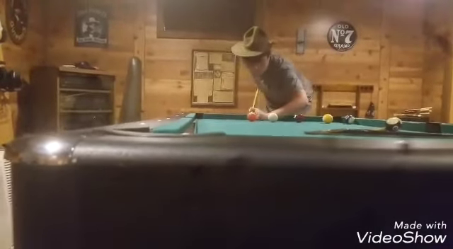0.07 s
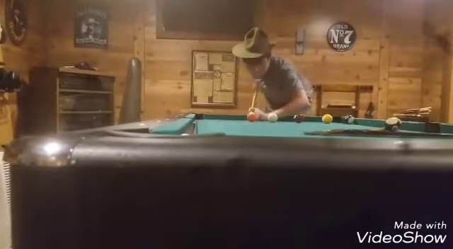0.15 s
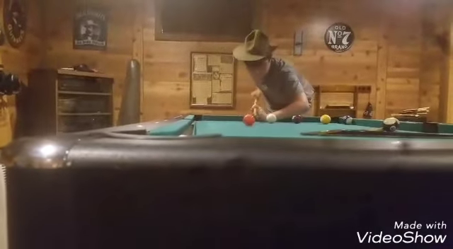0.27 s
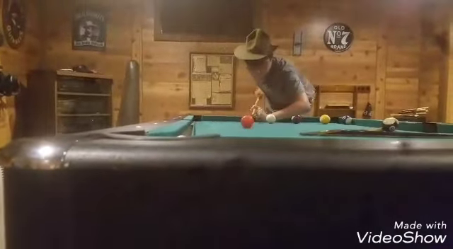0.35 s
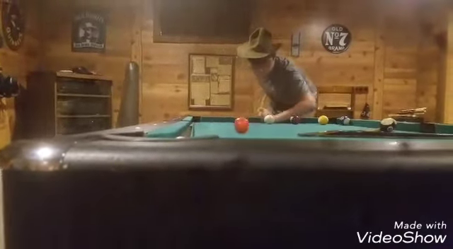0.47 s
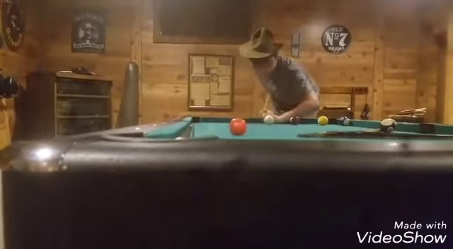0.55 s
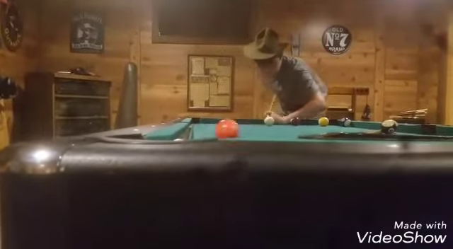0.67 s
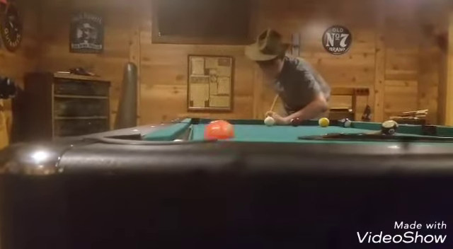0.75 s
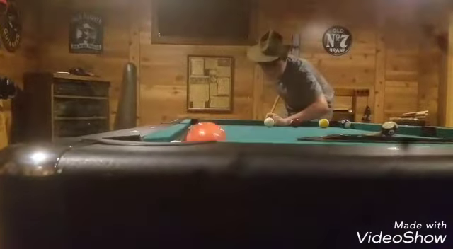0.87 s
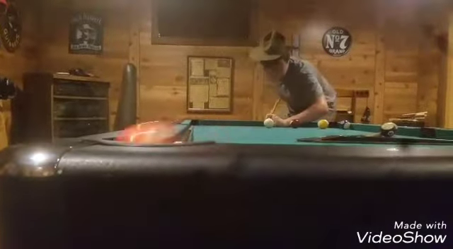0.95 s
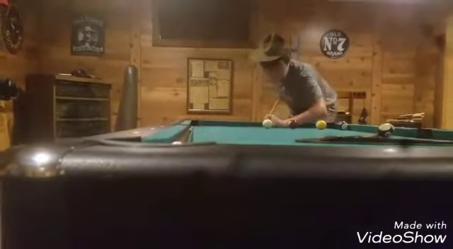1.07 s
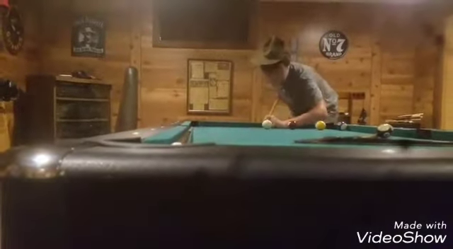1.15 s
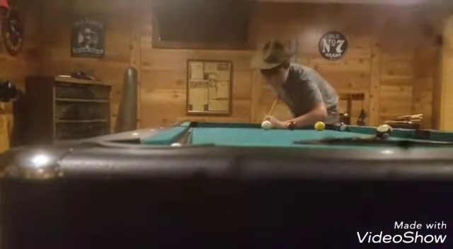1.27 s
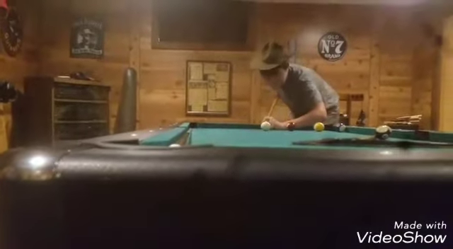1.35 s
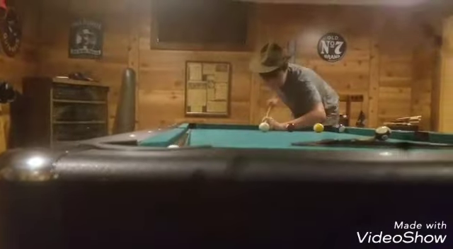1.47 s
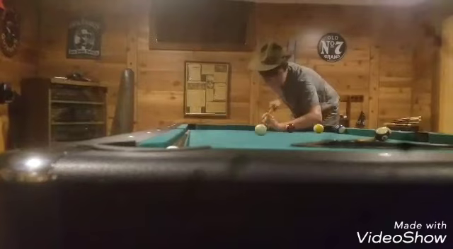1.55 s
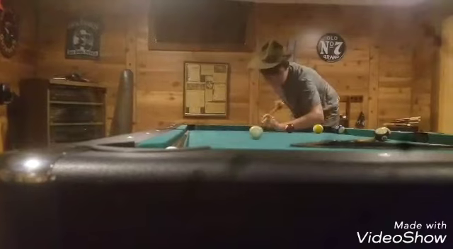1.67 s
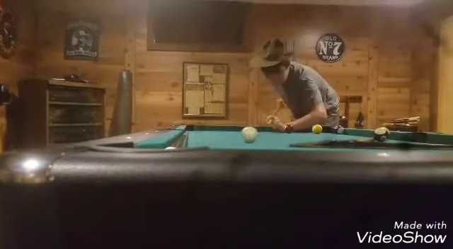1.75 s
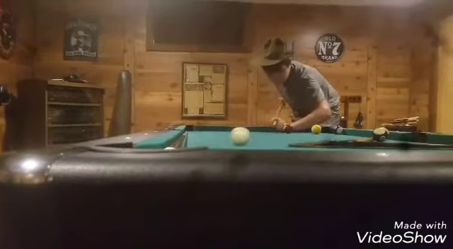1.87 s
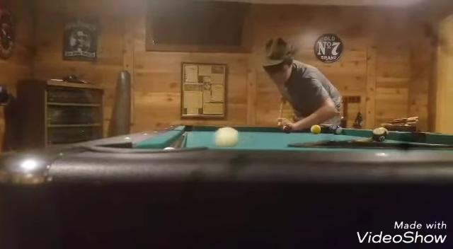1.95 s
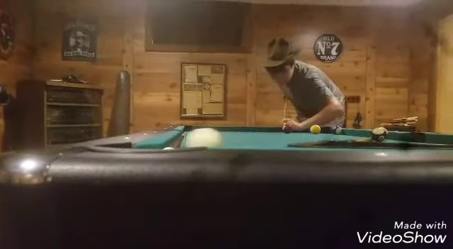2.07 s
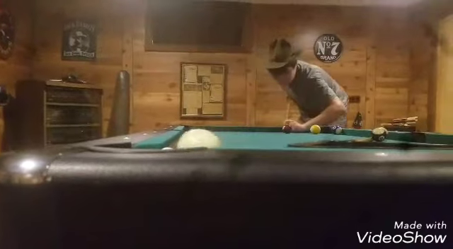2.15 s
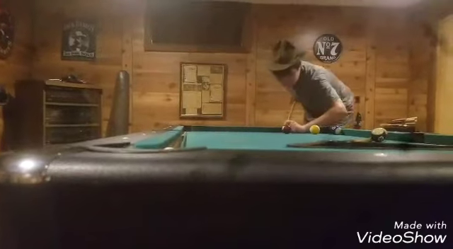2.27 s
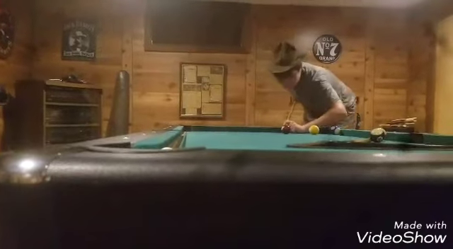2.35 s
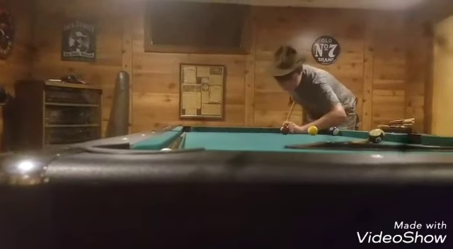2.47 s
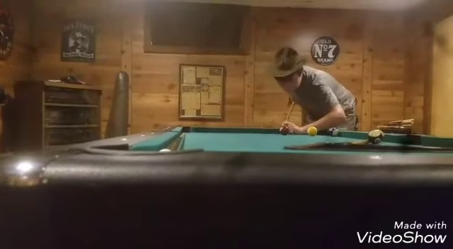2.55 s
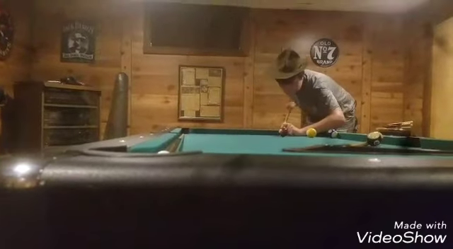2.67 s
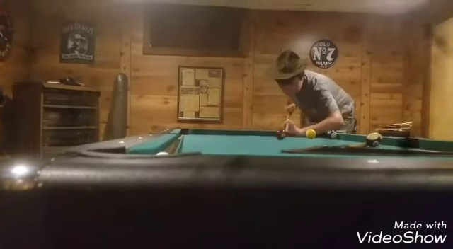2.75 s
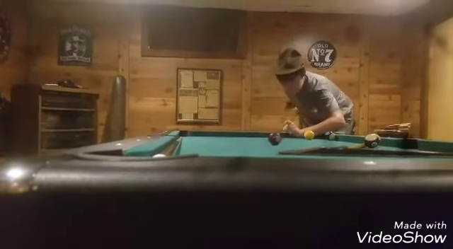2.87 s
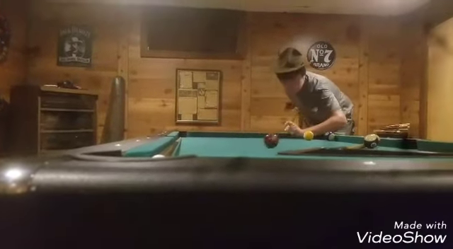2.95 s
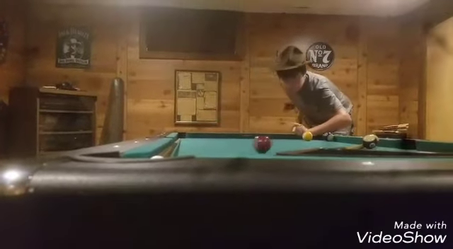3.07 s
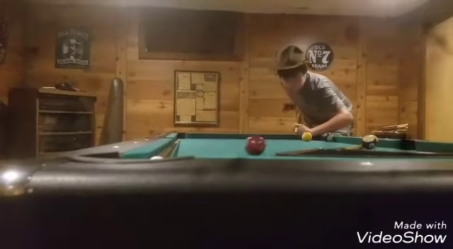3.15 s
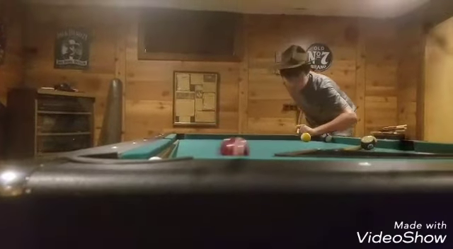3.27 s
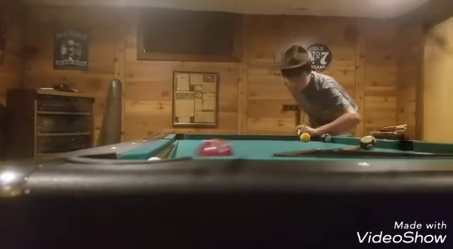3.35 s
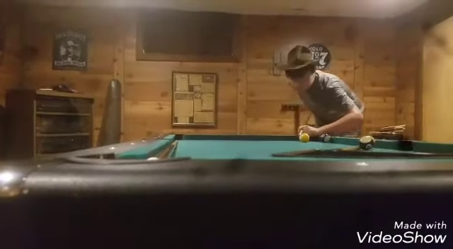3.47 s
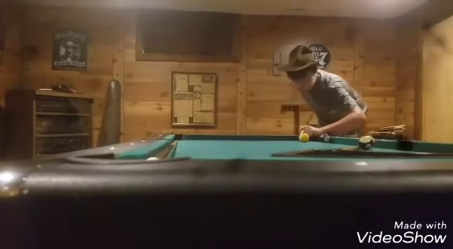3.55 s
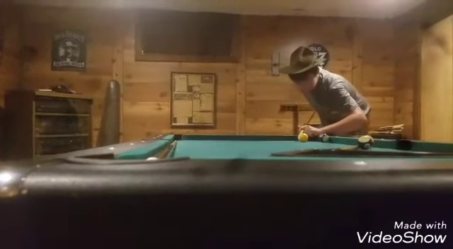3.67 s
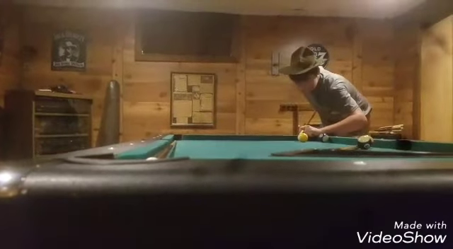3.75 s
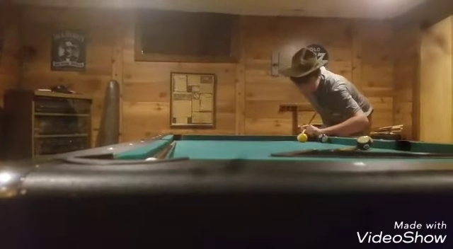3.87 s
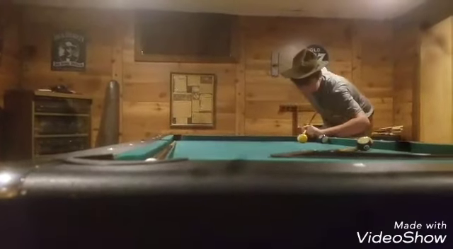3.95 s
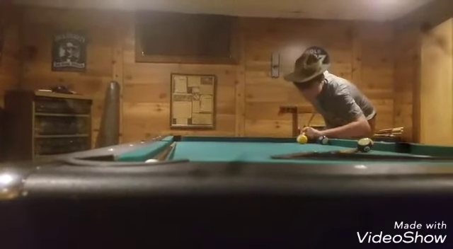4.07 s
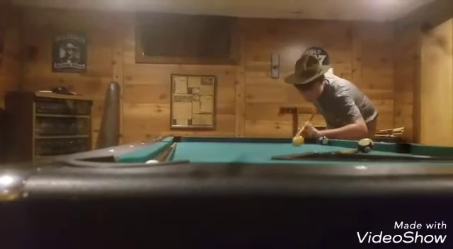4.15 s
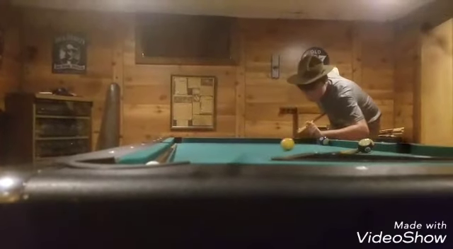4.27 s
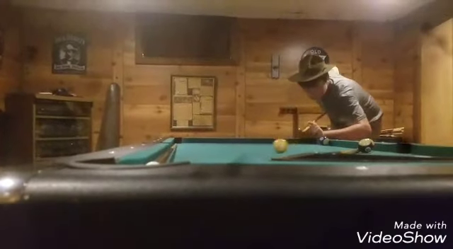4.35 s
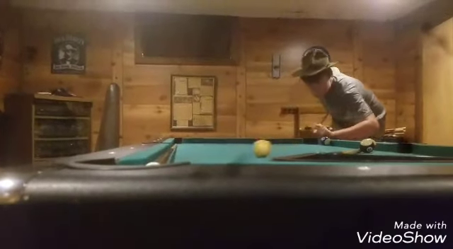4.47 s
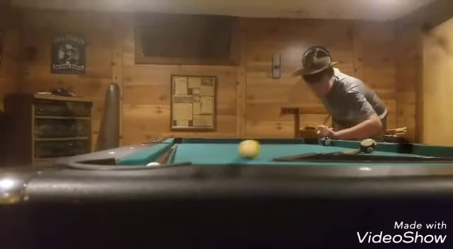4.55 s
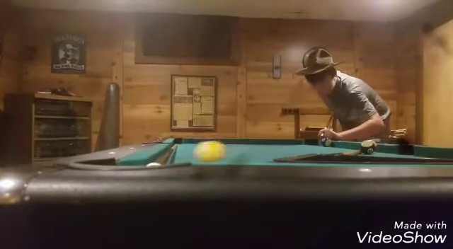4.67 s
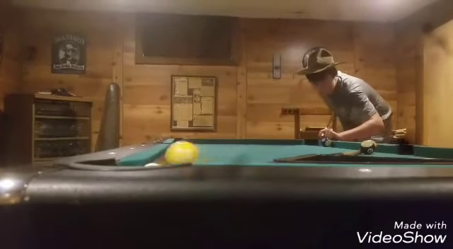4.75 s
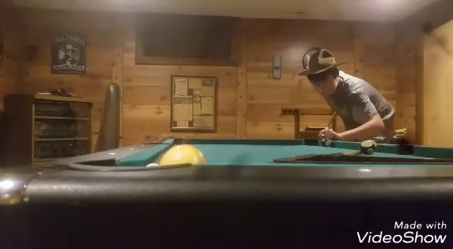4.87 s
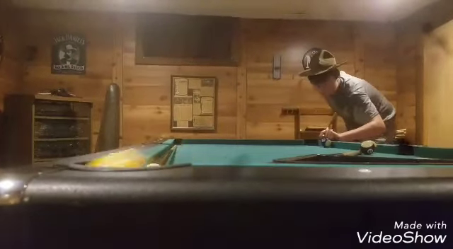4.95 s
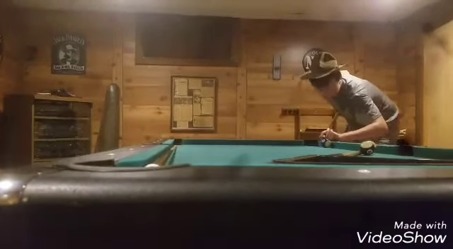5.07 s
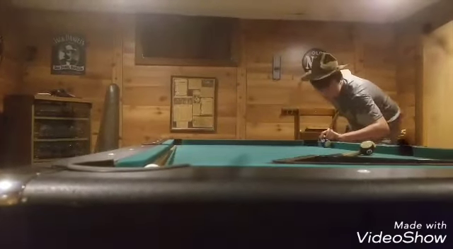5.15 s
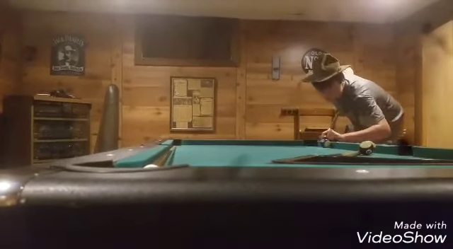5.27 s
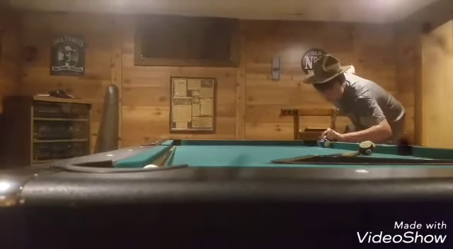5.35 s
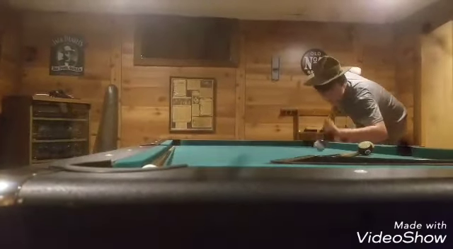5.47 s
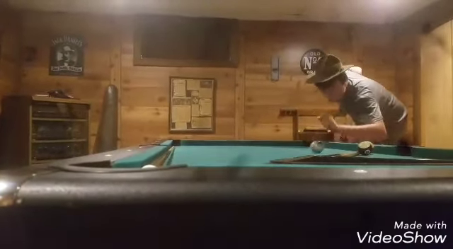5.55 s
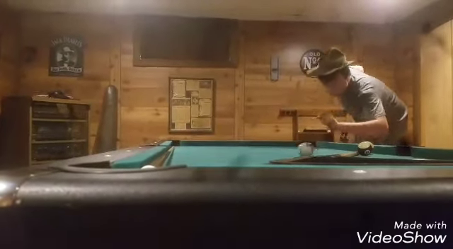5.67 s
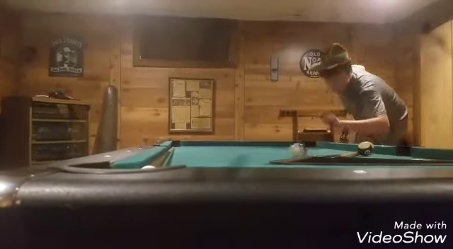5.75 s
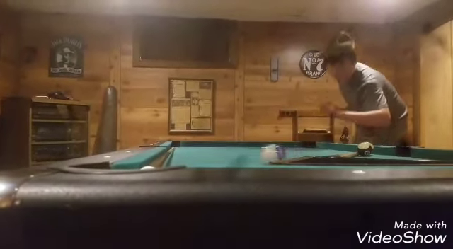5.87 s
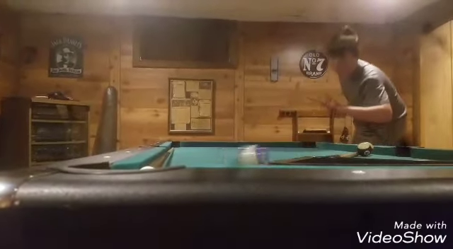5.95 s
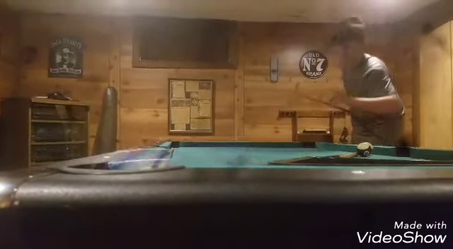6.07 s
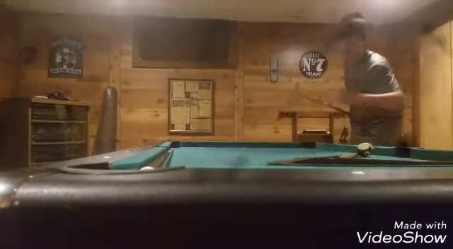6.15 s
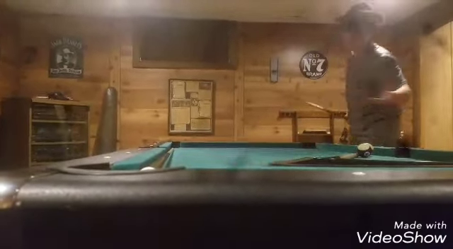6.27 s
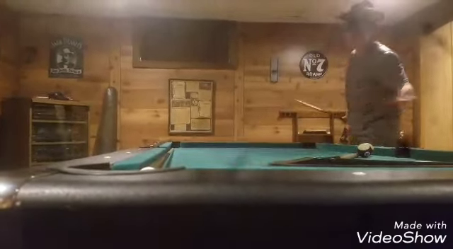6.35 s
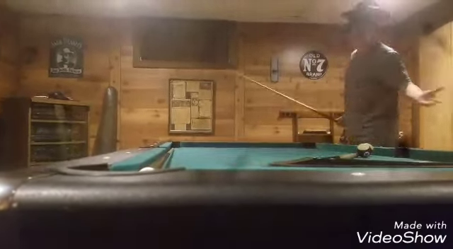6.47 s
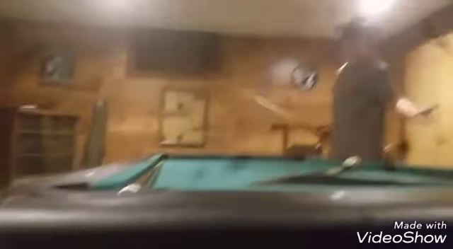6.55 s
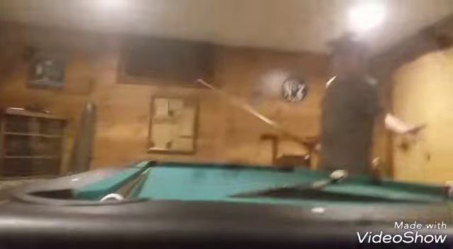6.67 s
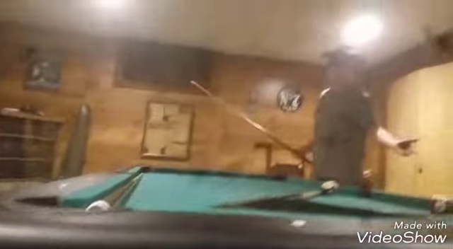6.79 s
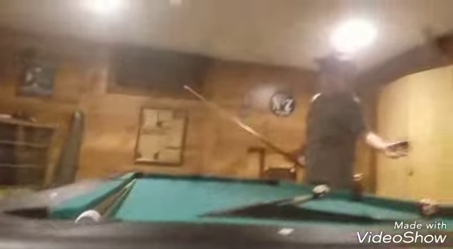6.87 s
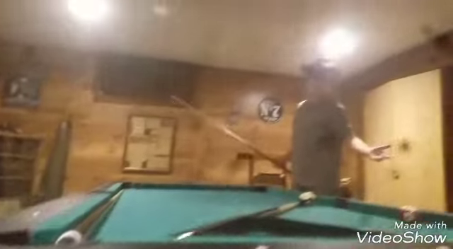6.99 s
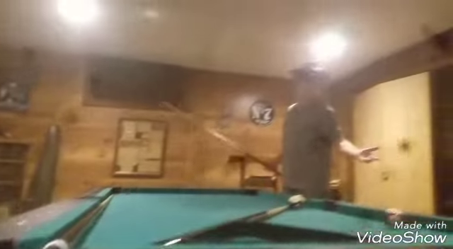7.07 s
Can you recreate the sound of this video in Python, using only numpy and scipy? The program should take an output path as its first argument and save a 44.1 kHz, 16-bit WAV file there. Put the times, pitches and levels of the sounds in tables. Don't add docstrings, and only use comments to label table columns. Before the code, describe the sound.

A phone resting on the table rail hears a player pocket five balls in a row. Dull cue knocks across the table alternate with louder, closer pocket impacts: thud, liner tick, then hard ball-on-ball clacks dying into a quick rattle. The fourth and fifth strokes are snappier, and the last ball rattles longest. Quiet room drone, fridge hum and very faint cricket chirps underneath.

```python
import sys
import numpy as np
from scipy import signal
from scipy.fft import rfft, irfft, next_fast_len
from scipy.io import wavfile
from scipy.ndimage import uniform_filter1d

SR = 44100
rng = np.random.default_rng(int(sys.argv[2]) if len(sys.argv) > 2 else 0)


def transcribe(u):
    v = np.clip(np.atleast_2d(u).T, -1, 1)
    q = np.round(v * 32767).astype(np.int16)
    wavfile.write(sys.argv[1], SR, q)


def level_to_linear(level):
    exponent = np.asarray(level, float) / 20
    return 10 ** exponent


N = 313985
TAIL = 2 ** 14
TIME = np.arange(TAIL) / SR
IMPULSE = (TIME == 0).astype(float)

# pitch in Hz, level in dB, t60 in seconds.
TABLE_MODES = [(95.4, -10, 0.26), (183.8, -3, 0.29), (228, 0, 0.052), (290.4, -6.5, 0.15),
               (425, -11.5, 0.11), (496, -7.5, 0.13), (657, 3, 0.014), (753, -9.5, 0.17), (995, -10, 0.11),
               (1139, -3, 0.12), (2110, -7, 0.06)]
# pitch in Hz, level in dB, t60 in seconds.
TRAY_MODES = [(1010, -77, 0.083), (1284, 5.5, 0.0063), (1670, -10, 0.035), (1882, -1.5, 0.059),
              (2090, 6.5, 0.024), (2502, 7, 0.0047), (2900, 4, 0.015), (3150, -17, 0.0055),
              (3750, -43, 0.0096), (4220, 16.5, 0.0096)]
# frequency in Hz, level in dB per Hz.
BALL_TONE = [(290, -11.5), (500, -1), (800, 1), (1300, 3), (1600, 4.5), (2100, 2.5), (2600, 7), (3100, 2),
             (3800, -6), (4600, -17.5), (5300, -25), (7000, -37.5), (12000, -42.5), (16000, -89)]


def unit(x):
    return x / np.sqrt(np.mean(x ** 2))


def fade(t60_s):
    return np.exp(-np.log(1000) * TIME / max(t60_s, 0.01))


def colour(x, points, causal=False):
    hz, db = np.transpose(points)
    size = next_fast_len(x.shape[-1])
    bin_hz = np.arange(size // 2 + 1) * SR / size
    log_gain = np.interp(np.log(bin_hz + 1), np.log(hz), db) * np.log(10) / 20
    if causal:
        cepstrum = irfft(log_gain, size)
        cepstrum[1:size // 2] *= 2
        log_gain = rfft(cepstrum[:size // 2], size)
    return irfft(rfft(x, size) * np.exp(log_gain), size)[..., :x.shape[-1]]


def port_colour(pair, difference, causal=False):
    left = colour(pair[0], [(hz, db / 2) for hz, db in difference], causal)
    right = colour(pair[1], [(hz, -db / 2) for hz, db in difference], causal)
    return np.array([left, right])


def spread(length):
    size = next_fast_len(length)
    mid, side = rfft(rng.standard_normal((2, size)))
    bin_hz = np.arange(len(mid)) * SR / size
    share = 1 / np.sqrt(1 + (1000 / (bin_hz + 1)) ** 2)
    return irfft(np.array([mid + share * side, mid - share * side]), size)[:, :length]


def swells(rows):
    t = np.arange(0, N, 64) / SR
    bells = sum(level_to_linear(db) * np.exp(-0.5 * ((t - s) / width_s) ** 2) for s, db, width_s in rows)
    return np.interp(np.arange(N) / SR, t, bells)


def echoes(wet_db, t60_s, build_s, sparse, flutter=0., late_s=0.):
    # delay in seconds, left level in dB, right level in dB.
    pocket_faces = [
        (.0032, -5, -2),
        (.0058, -6, -2),
        (.0096, -7, -6),
    ]
    air = spread(TAIL)
    bass = uniform_filter1d(air, size=60)
    treble = air - uniform_filter1d(air, size=8)
    middle = air - bass - treble
    tail = bass * fade(1.3 * t60_s) + middle * fade(t60_s) + treble * fade(0.92 * t60_s)
    tail *= (1 - np.exp(-TIME / build_s)) * level_to_linear(wet_db - 20.0 + 0.41 * np.minimum(TIME / 0.048, 1))

    chance = rng.random((12, 3))
    delay = (SR * (0.002092 + 0.032 * chance[:, 0] ** 1.2)).astype(int)
    tail[:, delay] += sparse * level_to_linear(wet_db) * (0.087 + 1.65 * chance[:, 1:].T) * fade(0.3 * t60_s)[delay]
    for delay_s, *port_db in pocket_faces:
        jitter = rng.standard_normal(2)
        at = int(delay_s * (1 + 0.01 * jitter[0]) * SR)
        tail[:, at] += flutter * level_to_linear(np.array(port_db) + 0.98 * jitter[1])
    tail[:, 0] = 1
    if late_s:
        dull = signal.lfilter(np.hanning(16) / 12.4, 1, tail)
        tail -= (tail - dull) * np.exp(-TIME / late_s)
    return tail


def add(out, s, db, pan_db, pulse, room, rise_s=1e-6):
    sound = signal.fftconvolve(np.atleast_2d(pulse), room, axes=1)[:, :TAIL]
    sound = sound * (1 - np.exp(-((TIME[:sound.shape[1]] + 1 / SR) / rise_s) ** 2))
    loudest = np.sqrt(uniform_filter1d(np.mean(sound ** 2, axis=0), size=250).max())
    start = int(s * SR)
    sound = sound[:, :N - start] * level_to_linear(db - 10.0) / loudest
    out[:, start:start + sound.shape[1]] += sound * level_to_linear(np.array([[pan_db], [-pan_db]]) / 2)


def ring(modes, pivot_hz):
    body = 0
    for hz, db, t60_s in modes:
        level, detune, side = rng.standard_normal(3)
        sign = -1 if hz > pivot_hz and side < 0 else 1
        swing = np.sin(2 * np.pi * hz * (1 + 0.018 * detune) * TIME)
        body = body + sign * level_to_linear(db + 2 * level) * swing * fade(t60_s)
    return body


def blows(rows, tone, modes, pivot_hz, body_db, build_s, sparse, flutter=0., late_s=0., rise_s=1e-6,
          contact_power=0., lead_s=0.):
    out = np.zeros((2, N))
    for s, db, tilt_db, wet_db, t60_s, pan_db in rows:
        reach = level_to_linear(contact_power * (db + 8))
        tilted = [(hz * reach, level_db + tilt_db * np.clip(np.log2(hz / pivot_hz), -1.5, 1.5))
                  for hz, level_db in tone]
        struck = IMPULSE + level_to_linear(body_db) * ring(modes, pivot_hz)
        pulse = colour(struck, tilted, causal=not lead_s)
        pulse = np.roll(pulse, int(lead_s * SR))[:TAIL * 3 // 4]
        onset = (TIME[:len(pulse)] + 1 / SR) / max(lead_s / 2, 1 / SR)
        pulse = pulse * np.minimum(onset, 1) ** 2
        add(out, s, db, pan_db, pulse, echoes(wet_db, t60_s, build_s, sparse, flutter, late_s), rise_s)
    return out


def cue_strokes():
    # start in seconds, level in dB, tilt in dB per octave, room share in dB,
    # decay in seconds.
    strokes = [
        (0.2863, 0, 3.5, 14, 0.26),
        (1.5539, 0, 2.5, -3, 0.24),
        (2.7841, -0.5, 4.5, -1.5, 0.23),
        (4.198, 0.5, 8, -2, 0.26),
        (5.488, -1.5, 10, 6, 0.28),
    ]
    # frequency in Hz, level in dB per Hz.
    cue_tone = [(35, -79), (60, -12), (113, -10.5), (169, -3.5), (283, 6), (760, -11), (1150, -19),
                (1500, -22.5), (1650, -35.5), (2090, -27.5), (3420, -39), (3840, -35), (12700, -49.5),
                (14700, -55.5), (16500, -91)]
    damped = [(hz, db, min(t60_s, 0.16)) for hz, db, t60_s in TABLE_MODES]
    return blows([(*row, 0) for row in strokes], cue_tone, damped, 280, body_db=-44, build_s=0.00032,
                 sparse=0.57, late_s=0.0068, rise_s=0.00084)


def pocket_thuds():
    # start in seconds, level in dB, tilt in dB per octave,
    # decay in seconds.
    wall_hits = [(1.0232, -2.5, 4, 0.24), (1.094, -8.5, 4.5, 0.18), (1.216, -12, -4.5, 0.12),
                 (2.2828, -2.5, 4, 0.28), (2.354, -14.5, 0, 0.18), (2.48, -7, -3, 0.16),
                 (3.51, -15, -4, 0.21), (3.58, -4, 7.5, 0.33), (4.281, -0.5, -2, 0.23),
                 (4.935, -10.5, 5.5, 0.28), (5.0135, -4, 3.5, 0.22), (5.086, -9.5, 7, 0.28),
                 (5.585, 1, 2.5, 0.25), (5.629, -1.5, -2.5, 0.094), (6.19, -12.5, -5, 0.18),
                 (6.242, -8.5, 5.5, 0.19)]
    # start in seconds, level in dB.
    slate_hops = [
        (0.62, -18.5),
        (1.778, -24.5),
        (1.922, -24),
        (3.149, -17.5),
        (4.462, -25),
        (4.607, -36),
        (5.841, -17),
    ]
    # frequency in Hz, level in dB per Hz.
    thud_tone = [(35, -110), (60, -22), (128, -18.5), (185, -11.5), (241, -1.5), (296, 2), (484, -4.5),
                 (547, -2), (859, -12.5), (1490, -31), (2250, -32), (8000, -58), (10400, -102),
                 (17600, -120)]
    room_db, pan_db = -7, 0.5
    rows = [(s, db, tilt_db, room_db, t60_s, pan_db) for s, db, tilt_db, t60_s in wall_hits]
    rows += [(s, db, -9, room_db, 0.22, pan_db) for s, db in slate_hops]
    thuds = blows(rows, thud_tone, TABLE_MODES, 416, body_db=-46.0, build_s=0.0011, sparse=0.59, rise_s=0.0011)
    thud_delay_s = 0.0035
    return np.roll(thuds, int(thud_delay_s * SR), axis=1)


def first_swings():
    # start in seconds, level in dB, pitch in Hz, ring in cycles.
    shoves = [
        (1.218, -10.5, 272, 1.06),
        (2.4812, -5, 300, 0.8),
        (4.283, -9, 222, 1.9),
        (5.5852, -11, 270, 2),
    ]
    # start in seconds, level in dB, pitch in Hz, ring in cycles.
    tips = [
        (0.2841, -11, 750, 0.8),
        (1.5523, -8, 750, 0.8),
        (2.7821, -8, 750, 0.8),
        (4.1958, -4, 750, 0.8),
        (5.4859, -2, 750, 0.8),
        (0.2865, -2, 400, 0.9),
        (1.5547, -4, 400, 0.9),
        (2.789, -1, 400, 0.9),
        (4.198, -6, 500, 0.9),
        (5.4887, -2, 700, 1.1),
    ]
    # start in seconds, level in dB.
    back_wall = [
        (1.0228, 1),
        (2.2824, 1),
        (5.0127, 0.5),
    ]
    # start in seconds, level in dB, pitch in Hz, ring in cycles.
    pulls = [
        (4.936, -7.5, 747, 5.2),
        (5.493, -9.5, 573, 9.5),
        (1.03, -9.5, 572, 5.2),
        (2.2183, -24, 1820, 1.4),
        (4.8652, -6.5, 1610, 1.3),
        (4.8705, -15.5, 1170, 0.96),
    ]
    out = np.zeros((2, N))
    wall = [(s, db, 610, 1.25) for s, db in back_wall]
    for rows, sign in ((shoves + tips + wall, 1), (pulls, -1)):
        for s, db, hz, ring_cycles in rows:
            cycle = hz * TIME[:2048]
            decay = np.exp(-2.6 * cycle / max(ring_cycles, 0.5))
            swing = sign * np.sin(2 * np.pi * cycle) * cycle ** 2 * decay
            add(out, s + 0.00107, db, 0, swing, np.ones((2, 1)))
    return out


def mouth_slaps():
    # start in seconds, level in dB, tilt in dB per octave, decay in seconds.
    slap_events = [(0.0, -30.5, -3.5, 0.37), (0.948, -20.5, -4, 0.54), (1.088, -14.5, 0, 0.21),
                   (2.2195, -15.5, -4, 0.58), (2.352, -10, -5.5, 0.2), (3.583, -10, -5.5, 0.27),
                   (4.867, -12.5, 0, 0.038), (4.871, -5.5, -3.5, 0.27), (5.082, -13.5, -8, 0.16),
                   (6.245, -7.5, -3, 0.36), (0.2844, -18.5, 0.5, 0.19), (1.5525, -20.5, 3.5, 0.27),
                   (2.782, -14.5, -4.5, 0.26), (4.1957, -16.5, 2, 0.24), (5.4874, -10, -7.5, 0.25)]
    # frequency in Hz, level in dB per Hz.
    slap_tone = [(290, -11), (500, -0.5), (900, 0.5), (1600, 4.5), (2300, 1), (3100, -2.5), (4500, -11),
                 (6000, -13), (9000, -27.5), (13000, -30.5), (16000, -73)]
    room_db, pan_db = 11, 1
    rows = [(s, db, tilt_db, room_db, t60_s, pan_db) for s, db, tilt_db, t60_s in slap_events]
    return blows(rows, slap_tone, TRAY_MODES, 1800, body_db=-40.5, build_s=0.00027, sparse=0.95, flutter=0.44)


def ball_clacks():
    # start in seconds, level in dB, room share in dB, decay in seconds.
    clack_events = [(1.171, -26.5, -1, 0.14), (1.1946, -7.5, -6, 0.23), (1.2168, -13, -10.5, 0.47),
                    (1.236, -16, -17, 0.13), (1.3253, -15.5, -7, 0.31), (1.3515, -24, -2.5, 0.098),
                    (1.395, -12.5, -12, 0.23), (1.427, -22, -8.5, 0.43), (2.465, -11, -3, 0.28),
                    (2.493, -12.5, -5.5, 0.23), (2.5973, -20.5, -4.5, 0.19), (2.6202, -24.5, -2.5, 0.26),
                    (3.6606, -7, -4.5, 0.23), (3.6976, -9, -8.5, 0.28), (3.774, -14, -11, 0.23),
                    (3.785, -15.5, -13.5, 0.6), (5.141, -8.5, -2, 0.14), (5.165, -11.5, 10, 0.18),
                    (5.1764, -10.5, -4.5, 0.32), (5.2656, -16, 3, 0.14), (5.285, -22.5, 5, 0.32),
                    (6.286, -5.5, -12, 0.16), (6.3, -9.5, 7, 0.16), (6.312, -10, -8, 0.3),
                    (6.3234, -13, -9, 0.2), (6.411, -22, 3, 0.19), (6.4437, -12, -2.5, 0.1),
                    (6.4708, -15.5, -5, 0.2)]
    # start in seconds, level in dB.
    light_touches = [(1.443, -43), (2.5616, -45), (2.5716, -24), (2.587, -23), (2.6426, -36), (3.7385, -30),
                     (3.8047, -18), (3.8187, -40), (3.857, -27.5), (3.8738, -26.5), (3.8915, -37),
                     (3.9205, -36), (3.94, -37), (5.212, -29), (5.2408, -23), (5.3107, -30), (5.335, -29.5),
                     (6.3728, -20.5), (6.385, -23), (6.4858, -24), (6.498, -22), (6.5175, -27),
                     (6.5305, -23.5), (6.544, -22.5), (6.5554, -30.5), (6.5745, -30), (6.588, -35),
                     (6.606, -42)]
    # from time in seconds, extra tilt in dB per octave.
    pile_parts = [
        (1.0, 1),
        (2.2, 6),
        (3.5, -2.5),
        (4.8, 0.5),
        (6.2, 1.5),
        (6.4, -1.5),
    ]
    pan_db = 1.5
    rows = []
    for s, db, wet_db, t60_s in clack_events:
        pile_db = [extra_db for from_s, extra_db in pile_parts if from_s < s][-1]
        rows.append((s, db, 6.5 + 0.4 * db + pile_db, wet_db, t60_s, pan_db))
    rows += [(s, db, -0.5, -3.5, 0.16, pan_db) for s, db in light_touches]
    clacks = blows(rows, BALL_TONE, TRAY_MODES, 2500, body_db=-44.5, build_s=0.003, sparse=0.71, flutter=0.99,
                   contact_power=0.084, lead_s=0.001)
    return -np.roll(clacks, -int(0.0007 * SR), axis=1)


def rattles():
    # start in seconds, end in seconds, level in dB, left minus right in dB, brightest Hz.
    jostles = [
        (0.0, 0.082, -31.5, 0, 1900),
        (0.946, 1.016, -53, -11, 1700),
        (1.413, 1.492, -35, -1, 1700),
        (2.524, 2.651, -30.5, -7, 1700),
        (3.804, 3.942, -45.5, 8.5, 1700),
        (5.18, 5.34, -27.5, -3, 2200),
        (6.297, 6.339, -13.5, -15, 2700),
        (6.492, 6.61, -34, 1, 1700),
    ]
    touches_per_s = 300
    out = np.zeros((2, N))
    for start_s, end_s, db, pan_db, bright_hz in jostles:
        length_s = end_s - start_s
        light = [(hz, level_db - 5 * abs(np.log2(hz / bright_hz))) for hz, level_db in BALL_TONE]
        strength = level_to_linear(3 * np.minimum(rng.exponential(size=TAIL), 3))
        touches = (rng.random(TAIL) < touches_per_s / SR) * strength
        touches = touches * (TIME < length_s) * level_to_linear(-10.5 * TIME / length_s) + IMPULSE
        add(out, start_s, db - 0.5, pan_db, colour(touches, light, causal=True),
            echoes(-1.6, 0.16, build_s=0.00075, sparse=0.31))
    return out


def liner_ticks():
    # start in seconds, level in dB, left minus right in dB.
    tick_events = [(0.95, -42, -2), (1.0244, -24, 12), (1.088, -13, 12), (1.1695, -30, 2), (2.221, -31, 0),
                   (2.285, -23.5, 9.5), (2.349, -10.5, 6.5), (2.4836, -31, 4), (3.514, -38, 8),
                   (3.5803, -8, 10), (4.8666, -23, 0), (3.636, -22, 6), (5.014, -20, 7),
                   (5.0833, -10.5, 10.5), (5.0867, -23.5, -10), (5.149, -17, 11), (5.5977, -24.5, 5),
                   (6.246, -5.5, 6), (6.257, -29, -4), (1.091, -22, -9), (4.212, -36, 8)]
    # frequency in Hz, level in dB per Hz.
    tick_tone = [(2500, -8), (4500, 3.5), (6500, -6), (10000, -7.5), (13500, -17.5), (15500, -22),
                 (16500, -37)]
    # frequency in Hz, left minus right in dB.
    body_shade = [(3000, -0.5), (5000, -12), (7500, -5.5), (14000, 8)]
    right_lag_s = 3.5e-4
    click = colour(IMPULSE, tick_tone, causal=True)
    click = port_colour([click, click], body_shade, causal=True)
    click[1] = np.roll(click[1], int(right_lag_s * SR))
    out = np.zeros((2, N))
    for s, db, pan_db in tick_events:
        add(out, s, db, pan_db, click, echoes(-12.5, 0.17, build_s=0.0003, sparse=0.66, flutter=0.4))
    return out


def treble_sizzles():
    # start in seconds, level in dB, decay in seconds.
    sizzle_events = [
        (2.786, -34, 0.22),
        (4.198, -30, 0.24),
        (6.247, -26, 0.077),
    ]
    # frequency in Hz, level in dB per Hz.
    sizzle_tone = [(6000, -31), (9000, -6), (12500, 7), (14500, -9), (15500, -32)]
    out = np.zeros((2, N))
    sizzle = colour(IMPULSE, sizzle_tone, causal=True)
    for s, db, t60_s in sizzle_events:
        add(out, s, db, 6, sizzle, echoes(22, t60_s, build_s=0.002, sparse=0.1))
    return out


def rolling():
    # start in seconds, end in seconds, rumble at the start in dB.
    rolls = [
        (0.45, 0.888, -45.5),
        (1.674, 2.17, -45.5),
        (2.945, 3.513, -47.5),
        (4.378, 4.806, -41),
        (5.692, 6.157, -49),
    ]
    # centre in seconds, rumble in dB, width in seconds.
    rough_booms = [(0.635, -36, 0.017), (1.77, -39.5, 0.019), (2.06, -42, 0.022), (3.06, -38.5, 0.05),
                   (3.16, -48, 0.061), (3.29, -44.5, 0.019), (4.62, -34, 0.0094), (4.77, -53, 0.058),
                   (5.69, -37, 0.029), (5.85, -36.5, 0.032), (6.09, -50, 0.15)]
    # centre in seconds, whisper in dB.
    shaft_slides = [(0.081, -77), (0.765, -61), (1.69, -74), (1.77, -79), (2.07, -65), (2.165, -61.5),
                    (2.92, -65), (3.34, -58.5), (4.45, -64), (4.6, -59), (4.81, -68), (5.69, -76)]
    # frequency in Hz, level in dB per Hz.
    cloth_tone = [(35, -34), (60, -31), (96, -4.5), (135, -14.5), (191, 1.5), (294, -2), (355, 2),
                  (532, -10.5), (715, -10), (1180, -50), (1500, -58), (1950, -88), (3300, -120)]
    whisper_tone = [(600, -24), (1500, 15.5), (3000, 15.5), (5500, 10.5), (9000, -1.5), (14000, -13)]
    sag_db_per_s, whisper_db, slide_width_s = 7, -80, 0.032
    t = np.arange(N) / SR
    slowing = sum(level_to_linear(db - sag_db_per_s * (t - start_s)) * ((t >= start_s) & (t < end_s))
                  for start_s, end_s, db in rolls)
    moving = uniform_filter1d(1. * (slowing > 0), size=600)
    rumble_gain = uniform_filter1d(slowing, size=600) + swells(rough_booms)
    whisper_gain = level_to_linear(whisper_db) * moving + swells([(*row, slide_width_s) for row in shaft_slides])
    bumps = level_to_linear(unit(uniform_filter1d(rng.standard_normal(N), size=700)))
    rumble = unit(colour(spread(N), cloth_tone) * bumps)
    whisper = unit(colour(spread(N), whisper_tone))
    return rumble * rumble_gain + whisper * whisper_gain


def cricket():
    # start in seconds, length in seconds, level in dB.
    chirp_events = [(0.143, 0.062, -77), (0.258, 0.055, -76), (.62, 0.2, -78), (1.216, .08, -74),
                    (1.67, .05, -76), (1.75, 0.073, -77), (2.662, .08, -79), (3.17, 0.16, -78),
                    (3.784, 0.075, -77), (4.124, .046, -77), (4.62, 0.088, -76), (4.786, 0.053, -77),
                    (5.285, 0.103, -73), (5.664, 0.057, -74), (5.804, .07, -90.5), (6.185, 0.033, -70),
                    (6.68, .08, -78), (6.835, .065, -78)]
    t = np.arange(N) / SR
    wing = rng.standard_normal((2, N))
    wing = unit(uniform_filter1d(uniform_filter1d(wing, size=450), size=450))
    drift = rng.standard_normal(N)
    drift = unit(uniform_filter1d(uniform_filter1d(drift, size=2500), size=2500))
    bent_s = np.cumsum(1 + 0.006 * drift) / SR
    chirps = swells([(6.7, -65, 0.018)]) * np.sin(2 * np.pi * 4820 * bent_s)
    for s, length_s, db in chirp_events:
        hz = 10060 * (1 + 0.0073 * rng.standard_normal())
        gate = uniform_filter1d(1. * ((t > s) & (t < s + length_s)), size=400)
        chirps += level_to_linear(db) * gate * np.sin(2 * np.pi * hz * bent_s)
    return chirps * wing * level_to_linear([[5.0], [-1.5]])


def fridge():
    # pitch in Hz, level in dB rms.
    hum_partials = [(60, -58.5), (160, -57.5), (235, -57.5)]
    t = np.arange(N) / SR
    hum = np.zeros(N)
    for hz, db in hum_partials:
        waver = level_to_linear(1.8 * unit(uniform_filter1d(rng.standard_normal(N), size=3000)))
        hum += level_to_linear(db + 2.0) * waver * np.sin(2 * np.pi * hz * t)
    return hum


def room_tone():
    # frequency in Hz, level in dB per Hz.
    drone_tone = [(12, -61), (31, -30), (39, -3), (59, -2.5), (72, -4.5), (86, -9.5), (155, -1.5),
                  (195, -7), (229, 0), (262, -10), (500, -8.5), (650, -60), (1100, -120)]
    # frequency in Hz, level in dB per Hz.
    air_tone = [(240, 1.5), (400, -17), (609, 3.5), (669, 2), (858, -1.5), (1210, -5), (1840, -9.5),
                (2290, -10), (6190, -27), (8000, -34), (12500, -27), (14800, -30.5), (15700, -26),
                (16500, -45)]
    drone = unit(colour(spread(N), drone_tone)) * level_to_linear(-51.5)
    hiss = unit(colour(spread(N), air_tone)) * level_to_linear(-52)
    return drone + hiss


def scene():
    # frequency in Hz, gain in dB.
    blow_bass = [(25, -12), (60, 3), (120, 1.5), (250, 0.5), (20000, -2)]
    hits = cue_strokes() + pocket_thuds() + first_swings() + mouth_slaps()
    hits += ball_clacks() + rattles() + liner_ticks() + treble_sizzles()
    return colour(hits, blow_bass, causal=True) + rolling() + cricket() + fridge() + room_tone()


def band_limit(x):
    return signal.sosfilt(signal.butter(12, 16990, fs=SR, output="sos"), x)


def record(dry):
    # frequency in Hz, left minus right in dB.
    port_difference = [(60, -1.5), (110, -3), (200, -2), (380, -2.5), (700, -4), (1290, -5), (2380, -4.5),
                       (4400, -6.5), (8120, -2), (15000, 5.5)]
    lag_s, headroom = 3e-5, 4.8
    ports = port_colour(dry, port_difference)
    size = next_fast_len(N)
    bin_hz = np.arange(size // 2 + 1) * SR / size
    ports[1] = irfft(rfft(ports[1], size) * np.exp(-2j * np.pi * bin_hz * lag_s), size)[:N]
    mix = np.clip(headroom * np.tanh(ports / headroom), -1, 1)
    return band_limit(mix)


dry = scene()
out = record(dry)
transcribe(out)
```